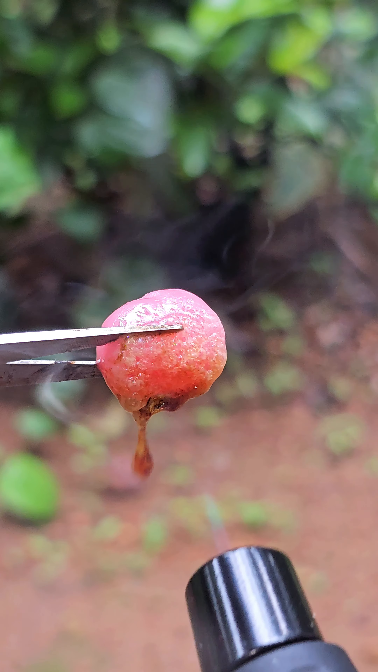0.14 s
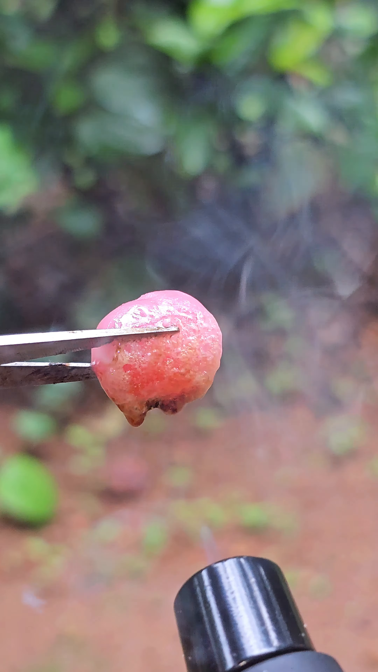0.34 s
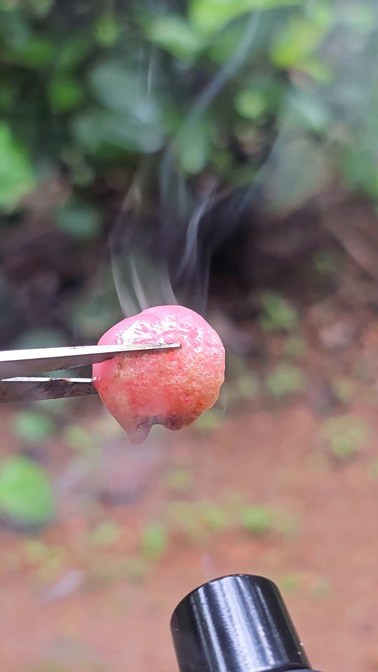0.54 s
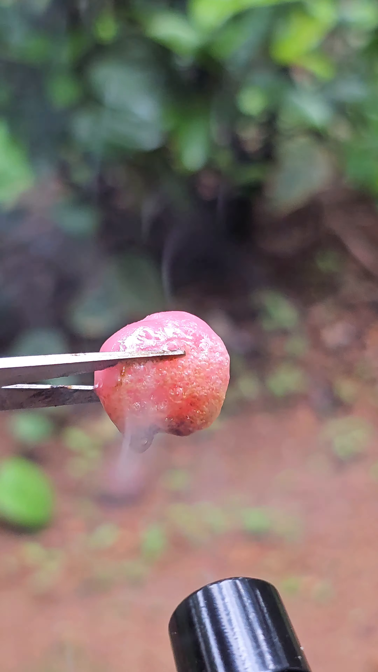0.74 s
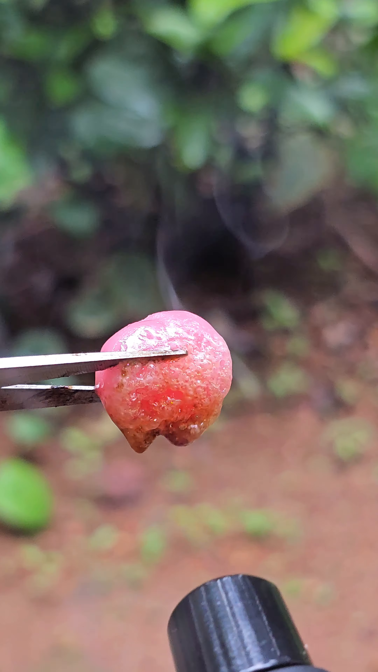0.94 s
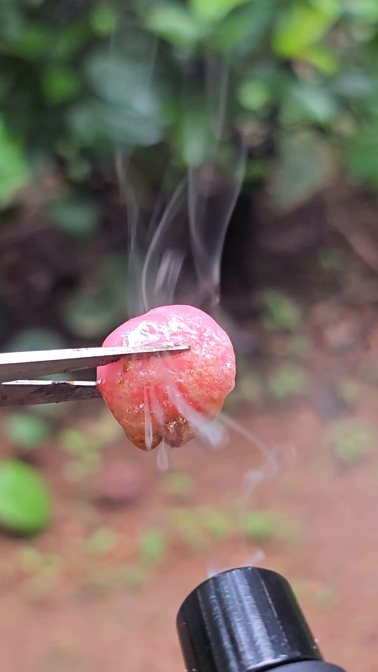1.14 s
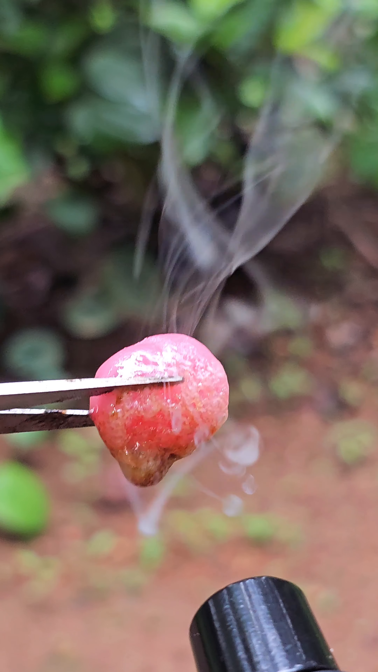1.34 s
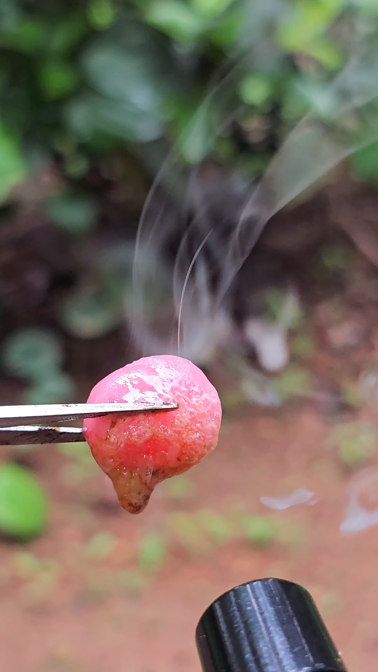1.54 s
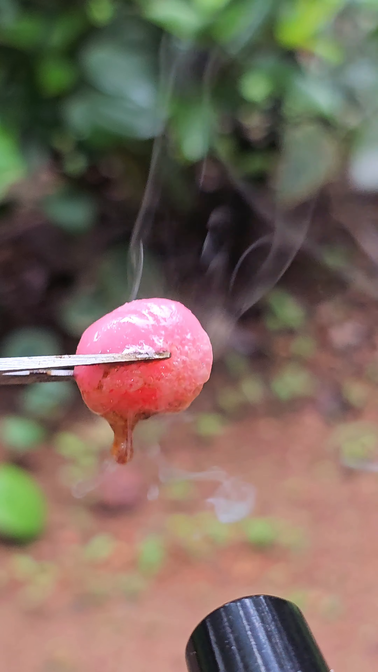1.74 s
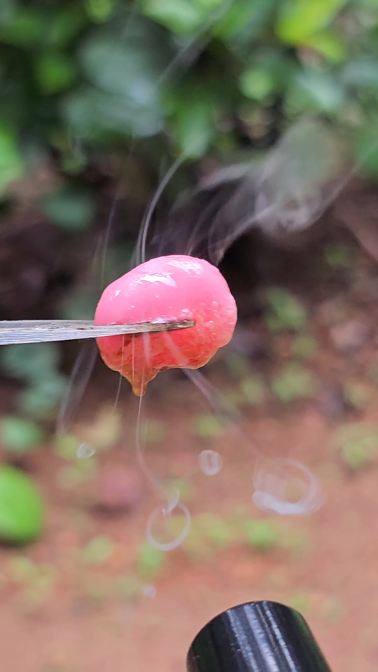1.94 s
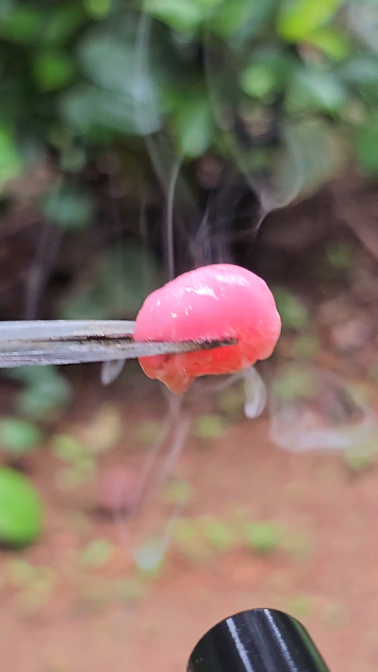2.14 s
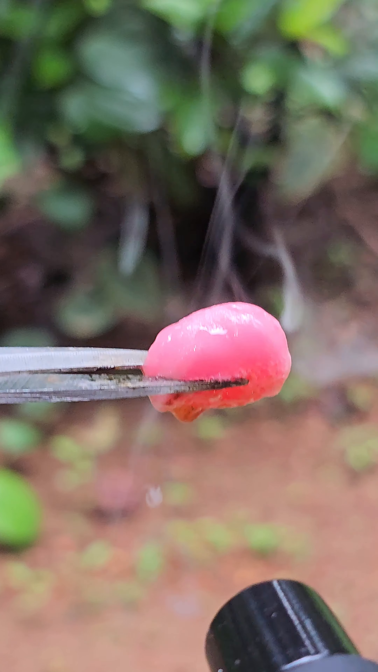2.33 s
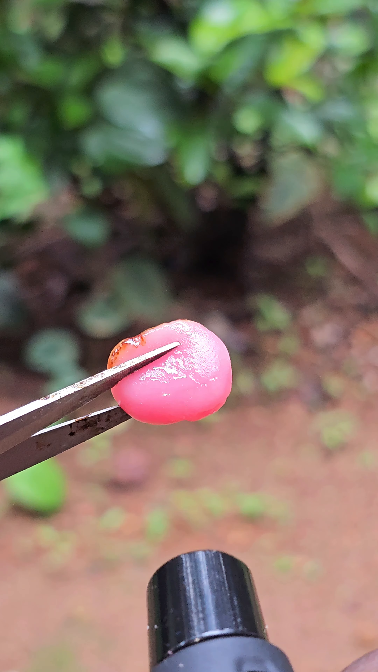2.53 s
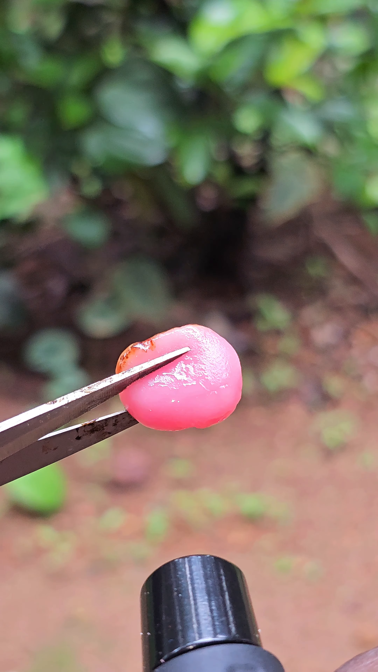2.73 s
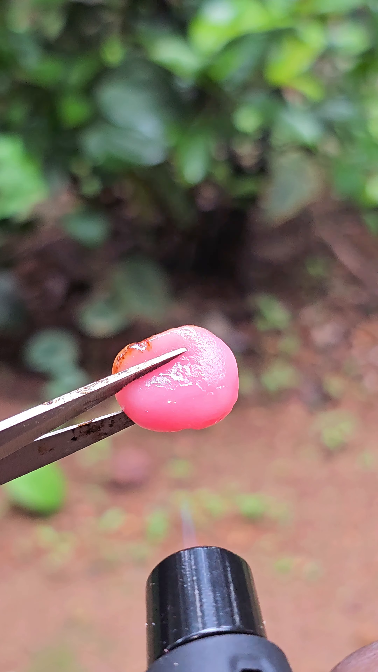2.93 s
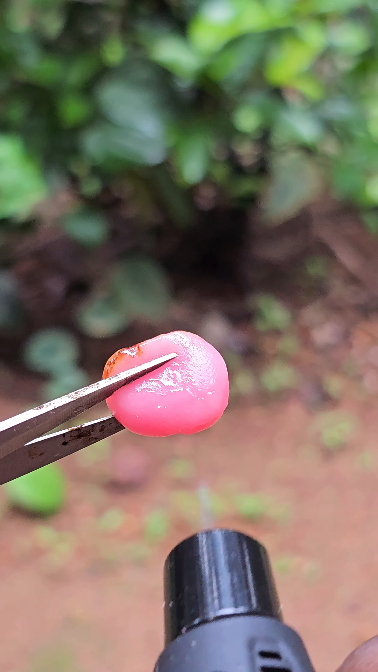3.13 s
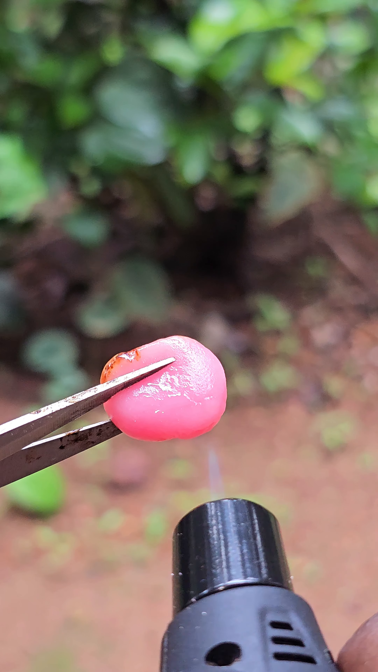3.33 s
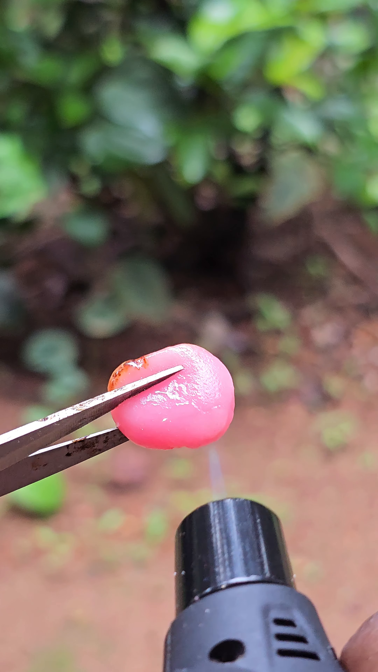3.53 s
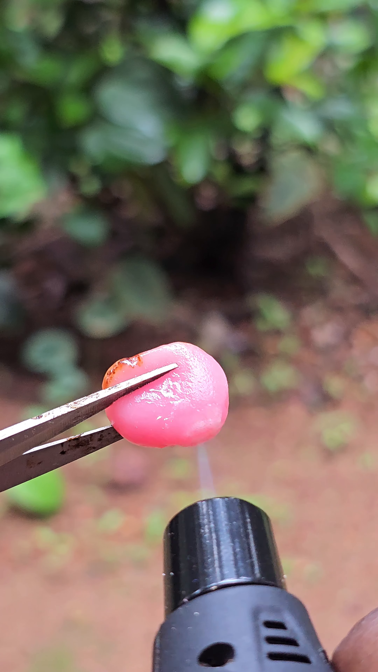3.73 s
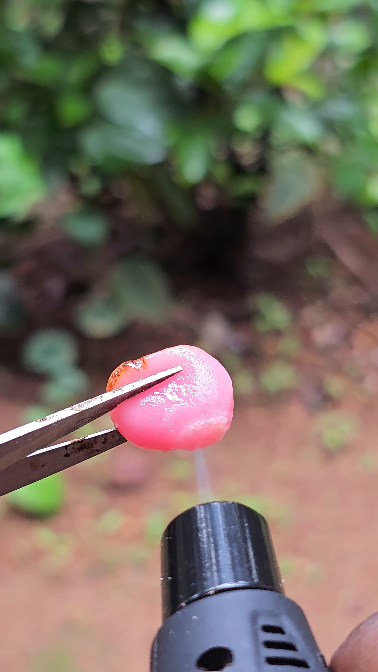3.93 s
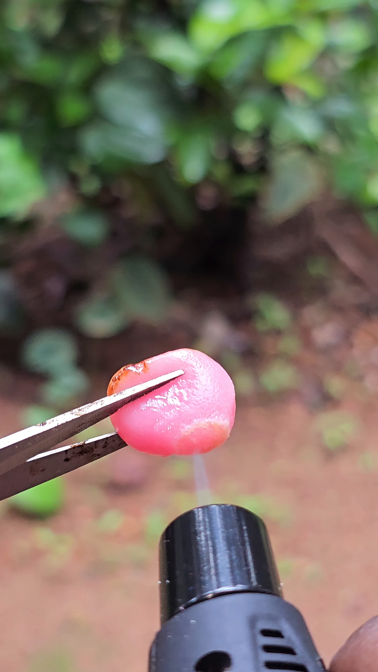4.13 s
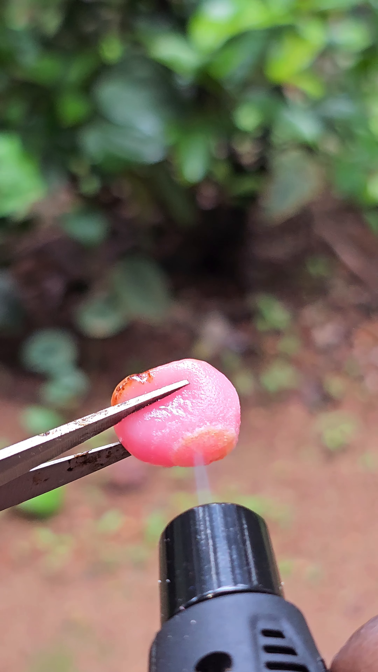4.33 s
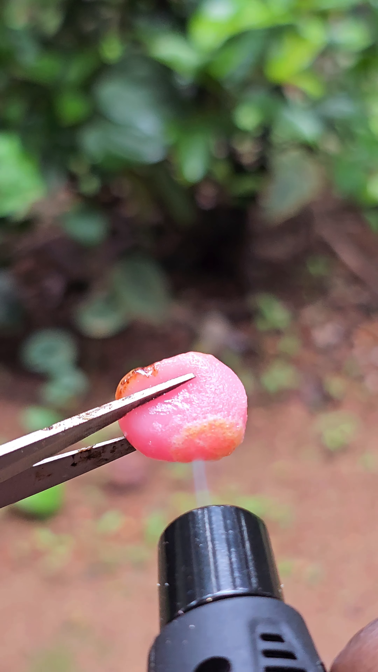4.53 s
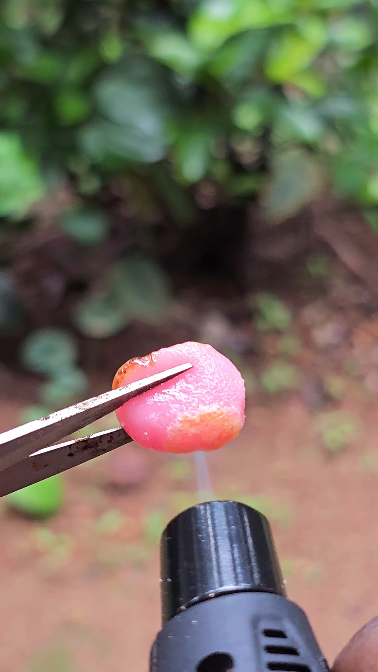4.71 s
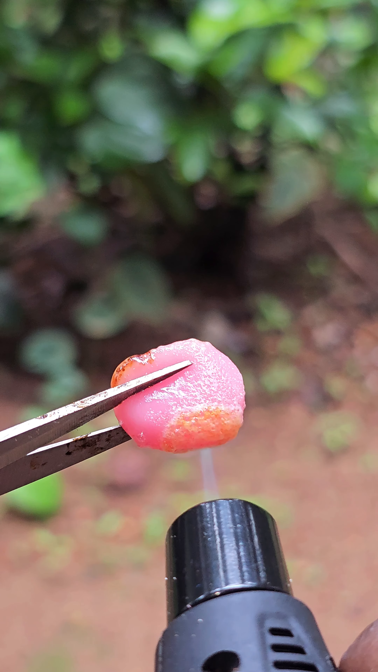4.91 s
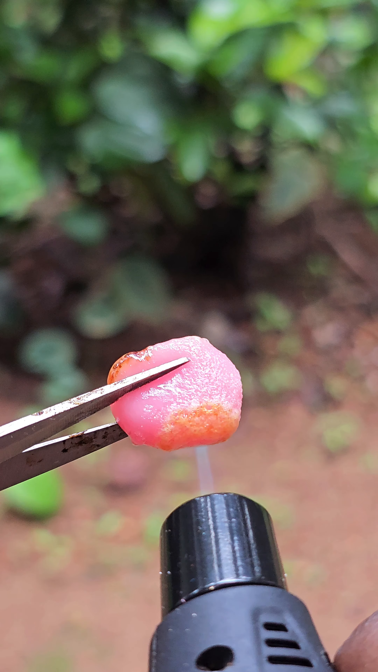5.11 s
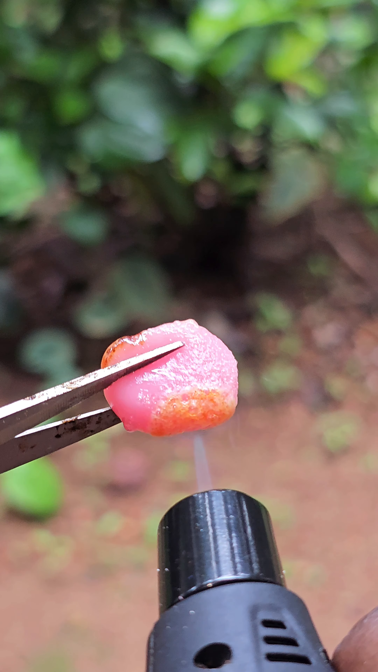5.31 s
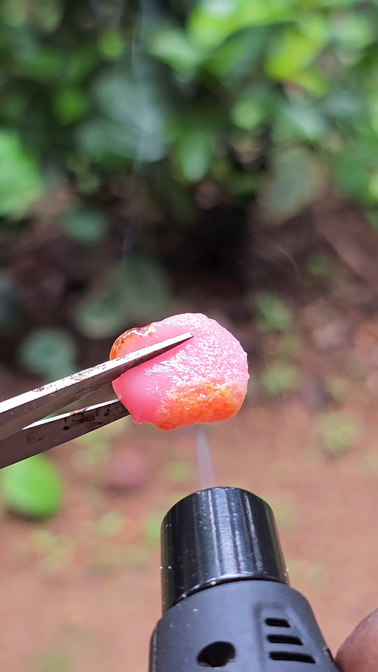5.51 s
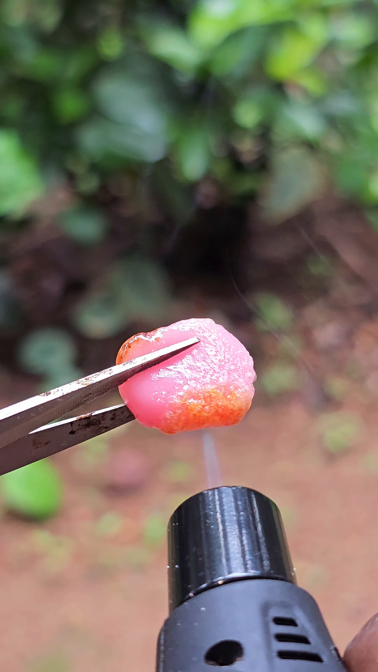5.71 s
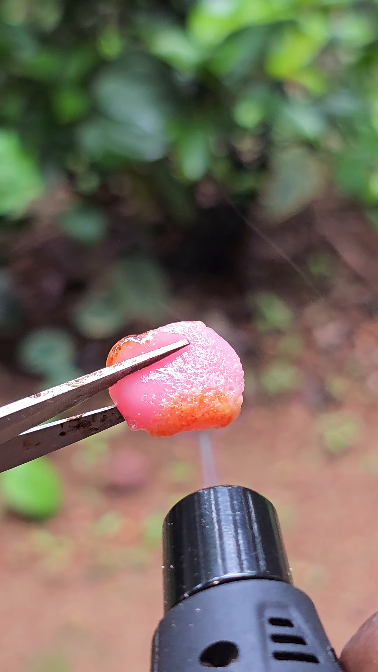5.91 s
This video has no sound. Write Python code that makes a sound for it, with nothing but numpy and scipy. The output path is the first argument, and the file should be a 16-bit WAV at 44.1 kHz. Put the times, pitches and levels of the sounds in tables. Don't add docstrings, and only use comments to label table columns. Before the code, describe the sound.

Steady jet flame cuts out with a plastic snap, faint sizzles and birdsong follow, then a sharp ignition click restarts the rushing hiss.

```python
import sys
import numpy as np
from scipy import signal
from scipy.fft import rfft, irfft, next_fast_len
from scipy.io import wavfile
from scipy.ndimage import map_coordinates

SR = 44100
rng = np.random.default_rng(int(sys.argv[2]) if len(sys.argv) > 2 else 0)


def elevation(decibels):
    levels = np.asarray(decibels, float)
    return 10 ** (levels / 20)


def store_wav(level_fs):
    pcm = np.round(np.clip(np.atleast_2d(level_fs), -1, 1) * 32767)
    wavfile.write(sys.argv[1], SR, pcm.T.astype(np.int16))


N = 262836


def unit(x):
    return x / np.sqrt(np.mean(x ** 2) + 1e-20)


def along(points, hz):
    f, *cols = np.transpose(points)
    return [np.interp(np.log(hz + 1), np.log(f + 1), c) for c in cols]


def curve(rows):
    s, values = np.transpose(rows)
    return np.interp(np.arange(N) / SR, s, values)


def swells(rows):
    t = np.arange(N) / SR
    return sum(db * np.exp(-((t - s) / half) ** 2) for s, db, half in rows)


def wobble(rate):
    knots = rng.standard_normal(int(N * rate / SR) + 4)
    return map_coordinates(knots, [np.arange(N) * rate / SR])


def after(s, t60, rise=.0001, size=N):
    t = np.maximum(np.arange(size) / SR - s, 0)
    return (1 - np.exp(-t / rise)) * elevation(-60 * t / t60)


def filtered(x, response):
    size = next_fast_len(x.shape[-1] + 8192)
    spectrum = rfft(x, size) * response(np.fft.rfftfreq(size, 1 / SR))
    return irfft(spectrum, size)[..., :x.shape[-1]]


def pair(shared, size=N):
    shared = np.clip(shared, 0, 1)
    common = np.sqrt(shared) * rng.standard_normal(size)
    return common + np.sqrt(1 - shared) * rng.standard_normal((2, size))


def ports(table, low_hz, order=0):
    # [f/Hz, torch held low/rad, raised/rad, on the fruit/rad, raw gas/rad]
    lead_table = [(600, .1, .1, .15, 0), (1400, .5, .5, .7, .3), (2400, .7, 1.1, 1.3, .6),
                  (3500, 1.6, 2.3, 2.7, 2.4), (4100, 2.0, 2.6, 3.14, 2.9), (4700, 2.8, 2.8, 3.2, 2.5),
                  (5500, 3.8, 3.8, 4.2, 3.1), (6200, 4.9, 5.8, 6, 4.6), (7400, 5.8, 6.4, 6.6, 5.1),
                  (8700, 7.8, 9.2, 9.4, 6.5), (10200, 10.1, 12, 12.5, 9.2), (11300, 13.5, 15.6, 15.8, 9.1),
                  (12800, 17, 18.4, 18.6, 11.2), (15700, 26, 27, 26.8, 18)]

    def response(hz):
        lead = along(lead_table, hz)[order - 1] * (order > 0)
        low_cut = 1 + (low_hz / (hz + 1)) ** 8
        return elevation(along(table, hz)) * np.exp([.5j * lead, -.5j * lead]) / low_cut
    return response


def casing(hz):
    band = 1 / (1 + (hz / 2700) ** 8) / (1 + (800 / (hz + 1)) ** 4)
    echo = np.array([[.4], [.22]]) * band * np.exp(-2j * np.pi * hz * .00152)
    return (1 + echo) * elevation(1.3 * np.exp(-((hz - 840) / 60) ** 2))


def causal(gain):
    cepstrum = irfft(np.log(gain + 1e-6))
    half = cepstrum.shape[-1] // 2
    cepstrum[..., 1:half] *= 2
    cepstrum[..., half + 1:] = 0
    return np.exp(rfft(cepstrum))


def traffic():
    # [f/Hz, level per Hz/dB]
    rumble_colour = [(28, -34), (38, -3), (47, 2), (58, -3.5), (75, -10), (95, -7.5), (125, -14.5),
                     (190, -18.5), (265, -17.5), (340, -41.5), (420, -57), (800, -120)]
    # [t/s, level change/dB, half length/s]
    lulls = [
        (.3, -3, .6),
        (3.25, -5, .25),
        (5.2, 2.5, .6),
    ]
    rumble = unit(filtered(pair(shared=0.99), lambda hz: elevation(along(rumble_colour, hz)[0])))
    return elevation(-63 + swells(lulls) + .7 * wobble(1.2)) * rumble


def passing_vehicle():
    t = np.arange(N) / SR
    pass_s, rise_s, fall_s = 2.55, .08, .14
    whine = unit(filtered(pair(shared=.3), lambda hz: np.exp(-((hz - 1600) / 350) ** 2)))
    nearness = (t - pass_s) / np.where(t < pass_s, rise_s, fall_s)
    return elevation(-77) / (1 + nearness ** 2) * whine


def leaves():
    # [f/Hz, left level per Hz/dB, right level per Hz/dB]
    garden_colour = [(350, 0.5, -8), (1060, -11, -12.5), (1290.0, -7.5, -14.5), (2410.0, -17.0, -19),
                     (5450, -19, -13), (5860.0, -25.0, -20.5), (8500, -33, -38), (8870.0, -29.5, -36),
                     (10160.0, -44, -46), (11460.0, -21, -19), (13950.0, -18, -24.5), (15680.0, -20, -22.5)]
    # [t/s, rise/dB, half length/s]
    breezes = [
        (1.05, 4, .35),
        (2.35, 4.5, .08),
    ]
    air = unit(filtered(pair(shared=0.1), ports(garden_colour, low_hz=250)))
    return elevation(-74 + swells(breezes) + 0.27 * wobble(6.15)) * air


def bird():
    # [start t/s, length/s, first f/Hz, fall/Hz per s, level/dB]
    whistles = [
        (1.24, .17, 4900, 1900, -77),
        (1.9, .16, 5150, 3800, -81),
        (2.04, .2, 4580, 900, -79),
        (1.82, .25, 5450, 900, -84),
        (1.7, .38, 1360, 0, -80),
        (2.35, .09, 5400, 1200, -79),
    ]
    out, t = np.zeros(N), np.arange(N) / SR
    for s, length, first_hz, fall, db in whistles:
        swell = np.abs(np.sin(np.pi * np.clip((t - s) / length, 0, 1))) ** .7
        cycles = (first_hz - fall * (t - s) / 2) * (t - s)
        out += elevation(db + 1.5) * swell * np.sin(2 * np.pi * cycles)
    blur = np.array([wobble(180), wobble(180)])
    return out * blur * elevation([[-3], [3]])


def sizzle():
    # [t/s, level/dB]
    seethes = [
        (1.03, -82.5),
        (2.3, -101),
    ]
    cooling_db_per_s = 27
    hiss = unit(filtered(pair(shared=.5), lambda hz: np.exp(-(np.log2((hz + 1) / 7500) / .6) ** 2)))
    return hiss * sum(elevation(db) * after(s, 60 / cooling_db_per_s, rise=.02) for s, db in seethes)


def spits():
    # [t/s, peak level/dB, centre f/Hz, fizz under the peak/dB]
    wet_spits = [
        (.607, -41, 12300, 7.5),
        (2.289, -42.5, 5270, 18),
        (2.2886, -48, 13000, 8),
        (2.324, -56, 8000, 16),
    ]
    # [t/s, peak level/dB, centre f/Hz, width/octaves]
    dry_ticks = [(1.019, -49, 1800, 1), (1.234, -61, 10100, .37), (1.253, -62, 6000, .6),
                 (1.486, -42, 1350, .55), (1.012, -56, 5400, .4), (1.4858, -52, 3800, .7),
                 (1.563, -59.5, 5600, .4), (1.5632, -60, 12500, .5), (1.624, -63, 13400, .3),
                 (1.639, -64, 13000, .3), (1.648, -64, 13000, .3), (1.773, -65.5, 6460, .27),
                 (1.906, -62, 13000, .31), (2.086, -70, 14000, .3), (2.195, -67, 9000, .6),
                 (2.553, -62, 3950, .43), (4.29, -44, 4500, .25)]
    wet_octaves, wet_t60 = .9, .17
    dry_under_db, dry_t60 = 28, .045
    events = [(s, db, hz, wet_octaves, under_db, wet_t60) for s, db, hz, under_db in wet_spits]
    events += [(s, db, hz, octaves, dry_under_db, dry_t60) for s, db, hz, octaves in dry_ticks]
    out, t = np.zeros((2, N + SR)), np.arange(SR // 4) / SR
    for s, db, centre_hz, octaves, under_db, t60 in events:
        band = lambda hz: np.exp(-(np.log2((hz + 1) / centre_hz) / octaves) ** 2)
        noise = rng.standard_normal((3, len(t)))
        noise = 0.56 * noise[0] + 0.87 * noise[1:]
        tick = elevation(db - 5.5 - 60 * t / 0.014)
        fizz = elevation(db - under_db - 60 * t / t60) * (1 - np.exp(-t / 0.0044))
        spit = filtered(noise * (tick + fizz), band) / np.std(filtered(noise, band))
        out[:, round(s * SR):][:, :len(t)] += spit
    return out[:, :N]


def snap(table, contacts, shared, kick=0., low_hz=300):
    start, size = contacts[0][0], SR // 2
    dying = sum(elevation(db) * after(s - start, t60, size=size) for s, db, t60 in contacts)
    force = pair(shared, size=size) * dying
    for s, db, _ in contacts:
        force[:, max(round((s - start) * SR), 0)] += kick * elevation(db)
    gain = ports(table, low_hz)
    scale = np.sqrt(np.mean(np.abs(gain(np.linspace(0, SR / 2, 4000))) ** 2))
    sound = filtered(force, lambda hz: causal(np.abs(gain(hz)))) / scale
    return np.pad(sound, ((0, 0), (round(start * SR), N)))[:, :N]


def valve_snap():
    # [f/Hz, left level per Hz/dB, right level per Hz/dB]
    valve_colour = [(340.0, -19.5, -21), (860.0, -18, -16), (1380.0, -6, 2), (2370, -16, -22),
                    (2960, -9.0, -2.5), (4080, -11.0, -2.5), (6140, -20.5, -13.0), (7060.0, -6, -4),
                    (8100, -32, -29.5), (9300.0, -21.5, -26), (10510.0, -33.0, -25), (10850.0, -22, -11),
                    (12230.0, -13.5, -19), (15680.0, -23, -25)]
    # [f/Hz, level/dB, t60/s]
    shell_modes = [(1320, -28, .018), (3000, -24.5, .011), (4200, -27, .01), (5500, -29, .01),
                   (7000, -29, .014)]
    t = np.arange(N) / SR
    rattle_colour = [(9000, -30, -30), (13000, 0, -6), (15500, 0, -6)]
    rattle = snap(rattle_colour, [(.9617, -39, .05)], shared=.5)
    contacts = [(.9617, -42, .035), (.9652, -29, .01), (.9664, -31, .012), (.968, -42, .022)]
    shut = snap(valve_colour, contacts, shared=.85, kick=3.5)
    for hz, db, t60 in shell_modes:
        shut = shut + elevation(db) * after(.9649, t60, rise=.0006) * np.sin(2 * np.pi * hz * (t - .9649))
    tones = np.sin(2 * np.pi * 2070 * t) + 0.27 * np.sin(2 * np.pi * 1394 * t)
    damped = np.clip((1.017 - t) / 0.0027, 0, 1)
    spring = elevation(-56.5) * after(0.974, .8, rise=0.0027) * damped * tones
    return rattle + shut + spring * elevation([[2.5], [-2.5]])


def hammer():
    # [f/Hz, left level per Hz/dB, right level per Hz/dB]
    hammer_colour = [(335, 1, -6), (710, -23.5, -24.5), (1380.0, -7, -7), (2160, -16, -29),
                     (3450.0, -8.5, -6), (3750, -27, -11.0), (6320, -7.5, -3), (7030, -13.5, -18.5),
                     (8610.0, -11.5, -17), (9700, -33, -24), (11800, -8.5, -10), (11400, 1.5, -25.0),
                     (12750.0, -23, -16), (15680.0, -5.5, -18.0)]
    # [f/Hz, left level per Hz/dB, right level per Hz/dB]
    yard_colour = [(340.0, -17, -18), (860.0, -35, -34), (1210.0, -19, -18), (2750, -11, -10),
                   (4130.0, 1, 1.5), (6800, -1, -6.5), (9820.0, -18, -24), (11710.0, -12.0, -15),
                   (12920.0, -14, -21.0), (16000, -9.0, -9)]
    t, strike_s = np.arange(N) / SR, 2.935
    creak = unit(filtered(pair(shared=0.38), lambda hz: np.exp(-((hz - 4900) / 900) ** 2)))
    mounting = elevation(-24 + 1700 * np.minimum(t - strike_s, 0)) * (t < strike_s)
    strain = creak * mounting * elevation([[-14], [2.5]])
    hits = [(2.935, -13, .01), (2.9357, -18, .008), (2.9375, -24, .008), (2.9388, -27, .025)]
    blow = snap(hammer_colour, hits, shared=0.62, kick=6.9, low_hz=900)
    tube_hz = np.array([[6200], [5900]])
    tube = elevation([[-8], [-4.5]]) * after(strike_s, .0075, rise=.0003)
    tube = tube * np.sin(2 * np.pi * tube_hz * (t - 2.9357))
    body = elevation(-19.5) * after(strike_s, 0.014, rise=0.0002) * np.sin(2 * np.pi * 1400 * (t - strike_s))
    yard = snap(yard_colour, [(2.941, -37, 0.32)], shared=.35)
    return strain + blow + tube + body + yard


def lighting_thump():
    # [f/Hz, level/dB, t60/s]
    cloud_modes = [(81, -32.5, 0.052), (165, -33, 0.025), (254, -35, 0.062)]
    t = np.arange(N) / SR - 2.9386
    swell = np.clip(1 + t / 0.015, 0, 1) ** 2
    ring = sum(elevation(db - 60 * np.abs(t) / t60) * np.cos(2 * np.pi * hz * t) for hz, db, t60 in cloud_modes)
    return -swell * ring * elevation([[1.1], [-1.1]])


def raw_gas():
    # [f/Hz, left level per Hz/dB, right level per Hz/dB]
    gas_colour = [(950.0, -19.0, -18.0), (2760.0, -15.0, -13.0), (3100.0, -24.0, -25.0),
                  (4390.0, -27.0, -26.0), (5080.0, -16.0, -7.0), (6030.0, -20.0, -6.0),
                  (7320.0, -4.0, -6.0), (9560.0, -16.0, -12.0), (11710.0, -7.0, -5.0),
                  (12060.0, -13.0, -12.0), (15160.0, -4.0, -12.0), (15680.0, -1.0, -7.0)]
    # [t/s, level/dB]
    flow = [
        (2.66, -105),
        (2.704, -59.5),
        (2.914, -55),
        (2.925, -43),
    ]
    t = np.arange(N) / SR
    hiss = unit(filtered(pair(shared=.6), ports(gas_colour, low_hz=900, order=4)))
    return elevation(curve(flow) + 1.0) * ((t > 2.66) & (t < 2.94)) * hiss


def flame(table, shared, order, bump_db=0., thin_db=0.):
    eddies = pair(shared) * elevation(0.87 * wobble(200) + 0.53 * wobble(25))
    bump = lambda hz: elevation(np.array([[0], [bump_db]]) * np.exp(-((hz - 4100) / 260) ** 2))
    path = ports(table, low_hz=385, order=order)
    jet = filtered(eddies, lambda hz: path(hz) * casing(hz) * bump(hz))
    thin = filtered(jet, lambda hz: 1 / (1 + (9500 / (hz + 1)) ** 12))
    return (jet + (elevation(thin_db) - 1) * thin) / np.std(jet)


def roar(deep_db=0.):
    # [f/Hz, level per Hz/dB]
    roar_colour = [(60, -26.5), (110, -13), (170, -12), (260, 2.5), (330, -6), (400, -29.5)]
    lumps = pair(shared=0.95) * elevation(2.7 * wobble(14))
    colour = lambda hz: elevation(along(roar_colour, hz)[0] + deep_db / (1 + (hz / 170) ** 6))
    return unit(filtered(lumps, colour)) * elevation([[1.1], [-1.1]])


def torch():
    # [f/Hz, left level per Hz/dB, right level per Hz/dB]
    low_colour = [(340.0, -11.0, -14.0), (430.0, -11.0, -17.0), (690.0, -8.0, -9.0), (1210.0, -5.0, -10.0),
                  (3530.0, -5.0, -4.0), (5600.0, -11.0, -2.0), (6800.0, -13.0, -12.0),
                  (8180.0, -14.0, -13.0), (9650.0, -27.0, -27.0), (10340.0, -26.0, -20.0),
                  (11540.0, -15.0, -18.0), (12140.0, -18.0, -17.0), (13090.0, -16.0, -26.0),
                  (15680.0, -12.0, -18.0)]
    # [f/Hz, left level per Hz/dB, right level per Hz/dB]
    lit_colour = [(340.0, -10.0, -13.0), (1460.0, -5.0, -8.0), (4650.0, -9.0, -7.0), (5430.0, -11.0, 0.0),
                  (5860.0, -18.0, -7.0), (6200.0, -12.0, -7.0), (6980.0, -15.0, -15.0),
                  (7240.0, -14.0, -14.0), (9300.0, -25.0, -24.0), (10160.0, -31.0, -32.0),
                  (10850.0, -22.0, -23.0), (12660.0, -15.0, -17.0), (15330.0, -13.0, -19.0),
                  (15680.0, -12.0, -17.0)]
    # [f/Hz, left level per Hz/dB, right level per Hz/dB]
    fruit_colour = [(340.0, -5.0, -8.0), (430.0, -5.0, -11.0), (690.0, -4.0, -5.0), (1460.0, -2.0, -7.0),
                    (4740.0, -9.0, -7.0), (5510.0, -12.0, -1.0), (5860.0, -18.0, -5.0),
                    (6290.0, -11.0, -5.0), (6720.0, -12.0, -12.0), (8010.0, -15.0, -13.0),
                    (9990.0, -28.0, -27.0), (12660.0, -8.0, -11.0), (15250.0, -7.0, -15.0),
                    (15680.0, -6.0, -11.0)]
    # [t/s, share turned away/0-1]
    turning = [
        (0, 0),
        (.35, .2),
        (.75, .9),
        (.95, 1),
    ]
    # [t/s, share on the fruit/0-1]
    splash = [
        (3.1, 0),
        (3.65, .8),
        (4.2, .9),
        (4.3, .6),
        (4.42, 1),
    ]
    # [t/s, rise/dB, half length/s]
    flares = [
        (3.9, 6, .4),
        (5.45, 4.5, .55),
    ]
    t, lit_s = np.arange(N) / SR, 2.936
    surge_db = 2.5 * wobble(7)

    away = np.clip(curve(turning), 0, 1)
    shut = np.where(t < .964, 1, elevation(-17 - 60 * (t - .964) / .45))
    jet = flame(low_colour, shared=.76, order=1, bump_db=4.5, thin_db=3 - 8 * away)
    first = elevation(-45.5 - 4 * away) * jet + elevation(-64.5 + surge_db) * roar(deep_db=13)

    tremor = .03 * np.abs(wobble(6))
    share = np.clip(curve(splash) - tremor, 0, 1)
    jet = np.sqrt(1 - share) * flame(lit_colour, shared=0.65, order=2)
    jet = jet + elevation(.3) * np.sqrt(share) * flame(fruit_colour, shared=.935, order=3)
    jet_db = -45.5 - .4 * (t - lit_s)
    second = elevation(jet_db) * jet + elevation(-67 + swells(flares) + surge_db) * roar()
    return shut * first + np.clip((t - lit_s) / 0.0048, 0, 1) * second


def scene():
    garden = traffic() + passing_vehicle() + leaves() + bird()
    fruit = sizzle() + spits()
    trigger = valve_snap() + hammer() + lighting_thump()
    return garden + fruit + trigger + raw_gas() + torch()


def roll_off(x):
    return signal.sosfilt(signal.butter(12, 15750, fs=SR, output="sos"), x)


def record(dry):
    return roll_off(dry)


dry = scene()
out = record(dry)
store_wav(out)
```